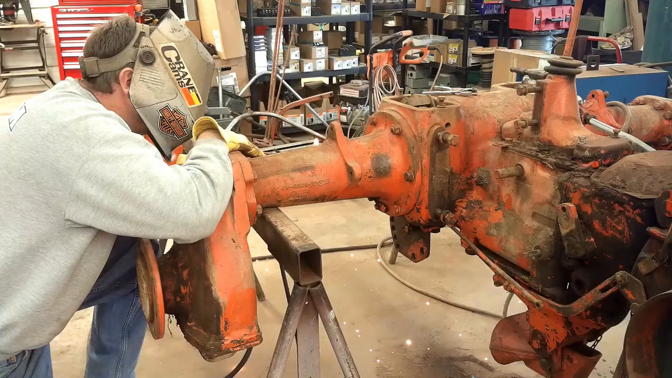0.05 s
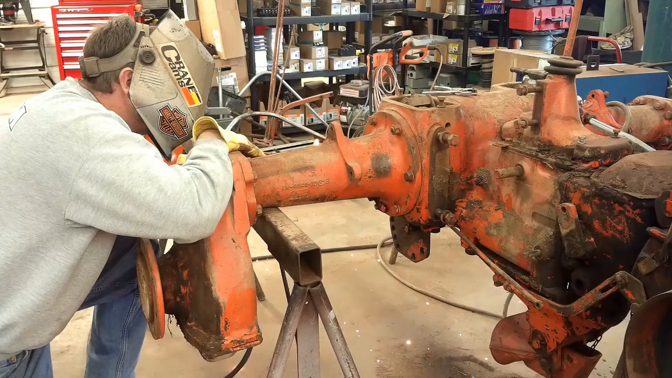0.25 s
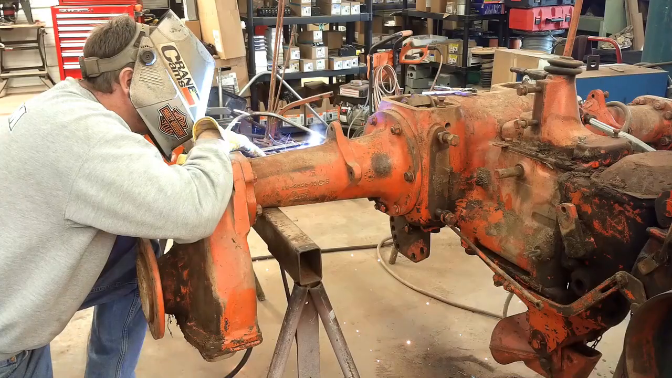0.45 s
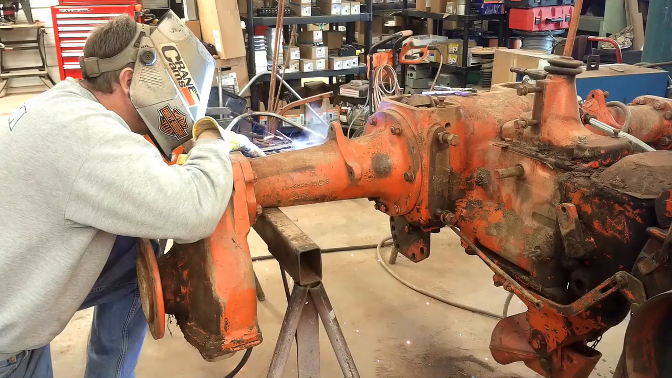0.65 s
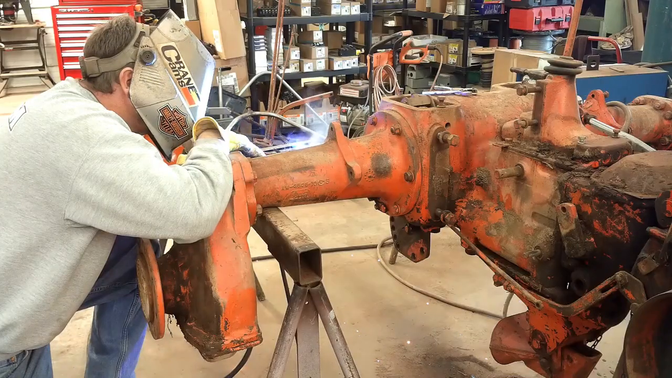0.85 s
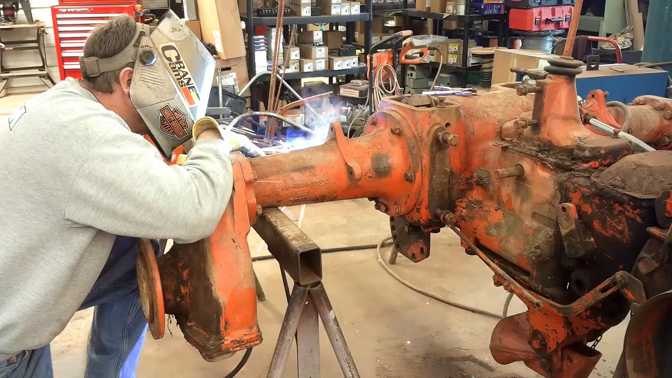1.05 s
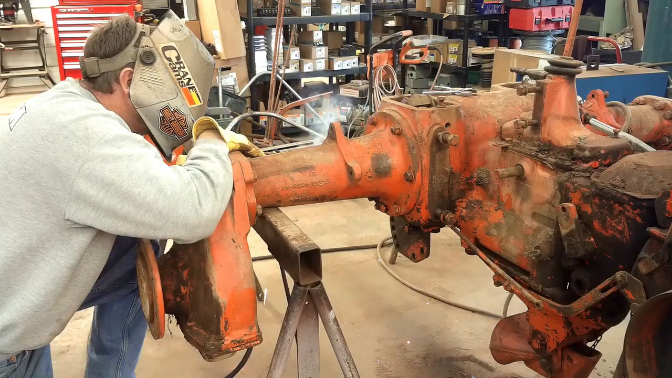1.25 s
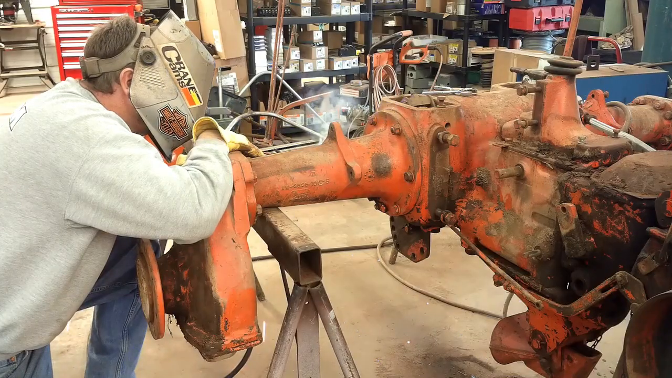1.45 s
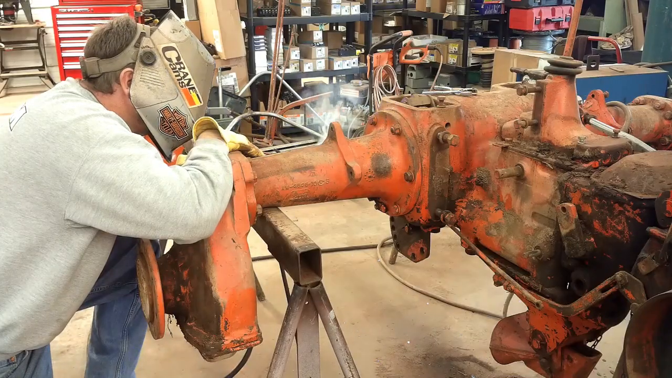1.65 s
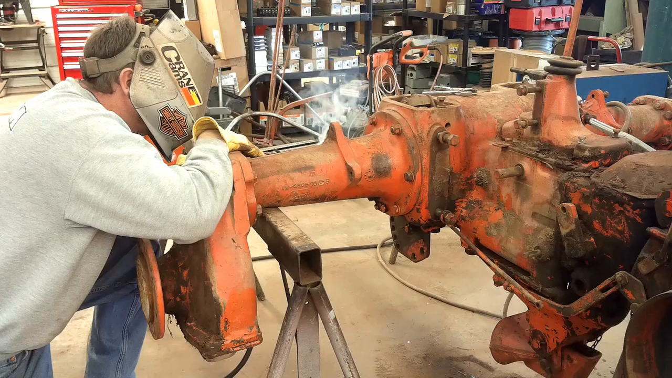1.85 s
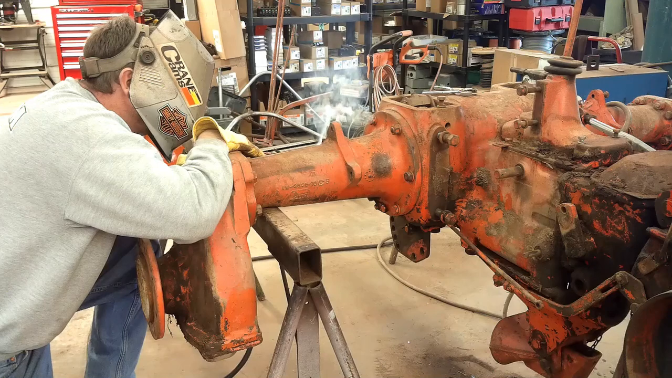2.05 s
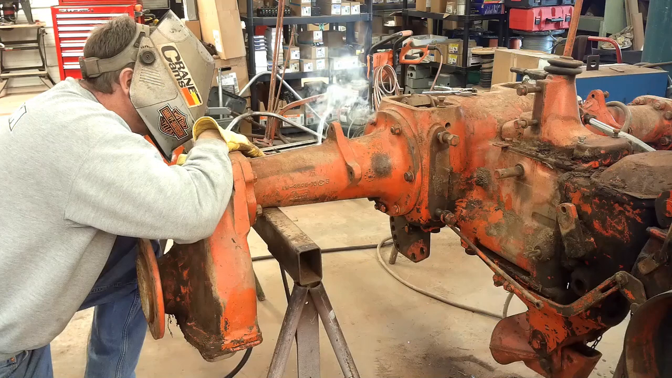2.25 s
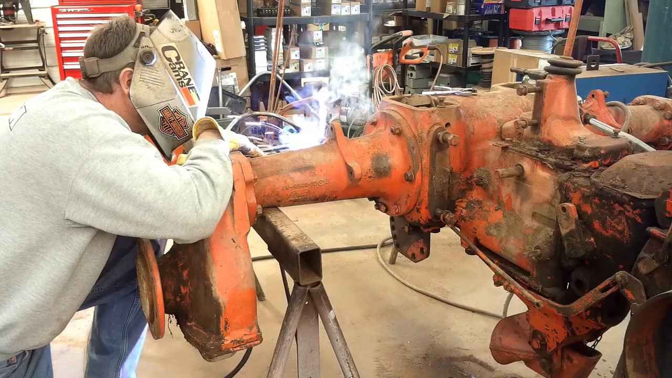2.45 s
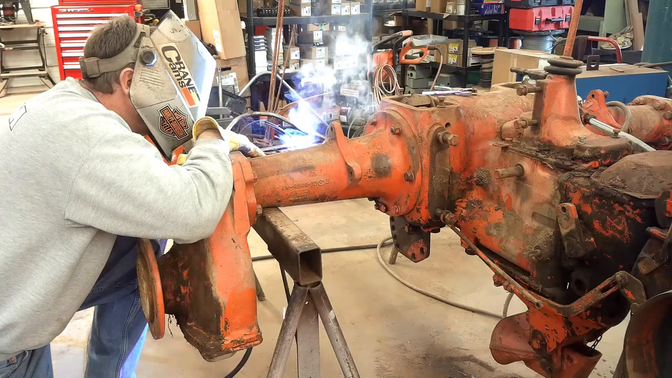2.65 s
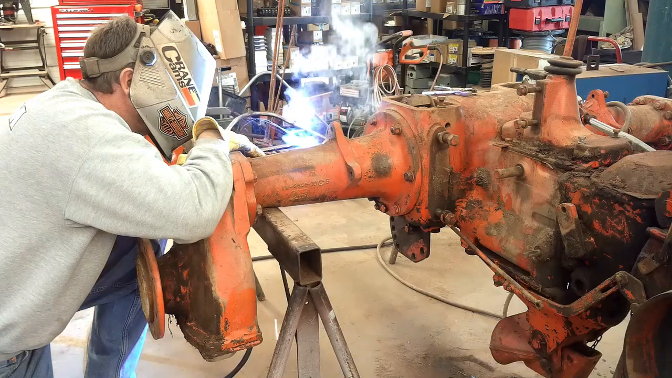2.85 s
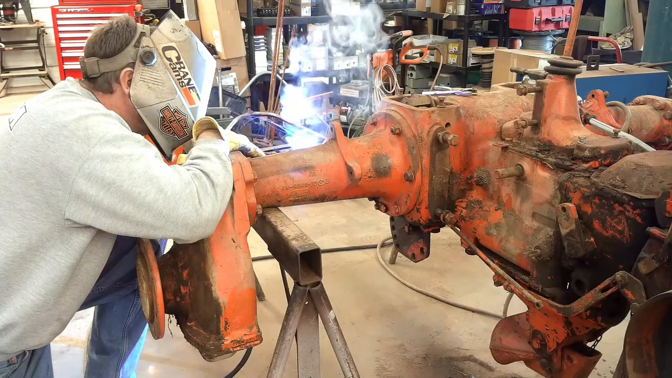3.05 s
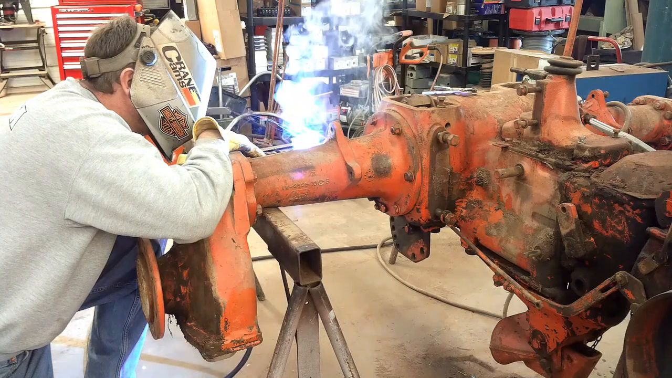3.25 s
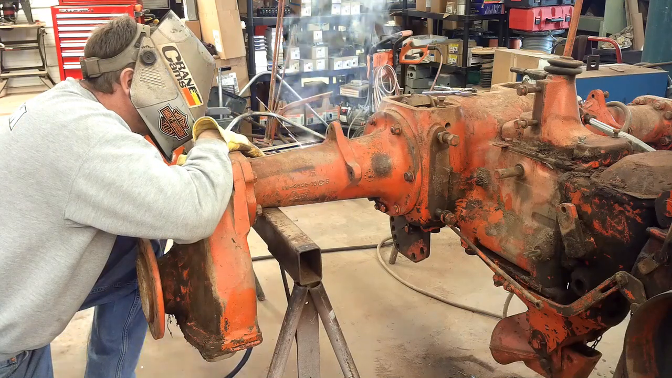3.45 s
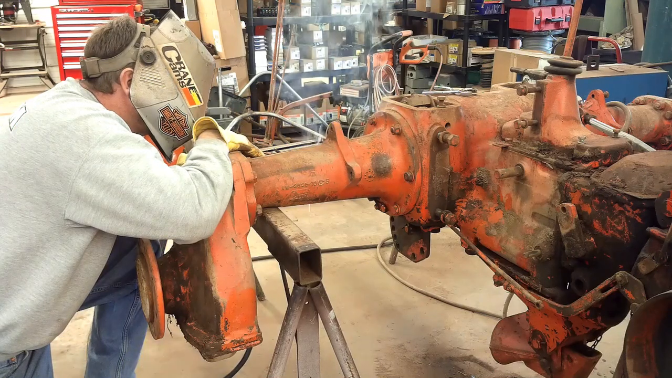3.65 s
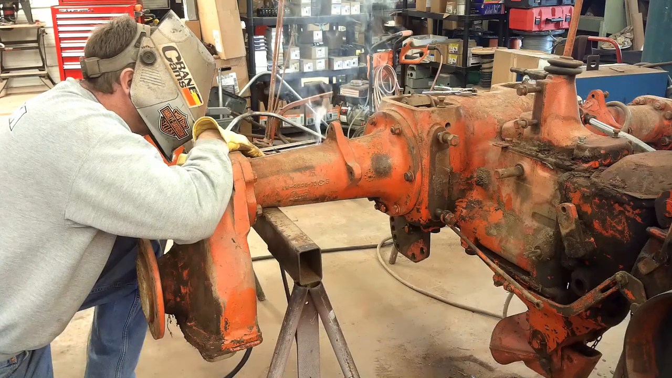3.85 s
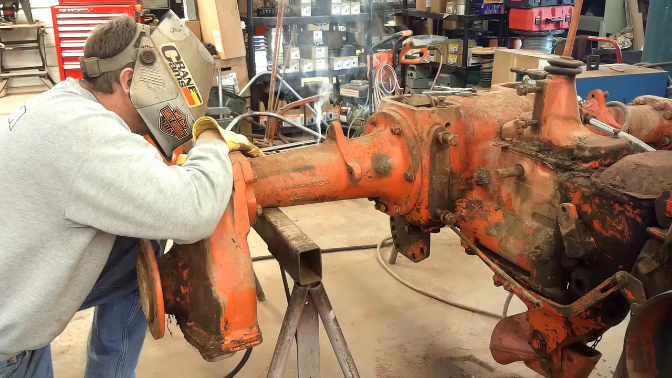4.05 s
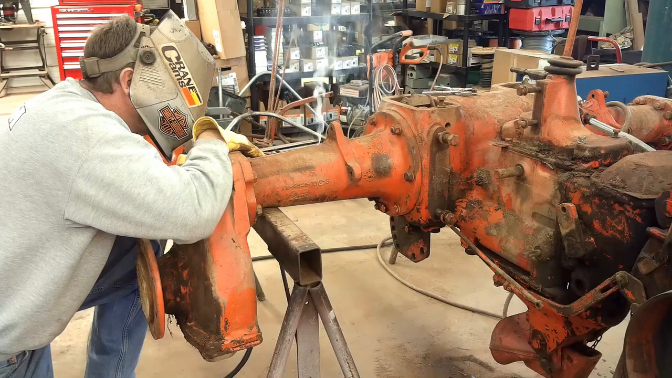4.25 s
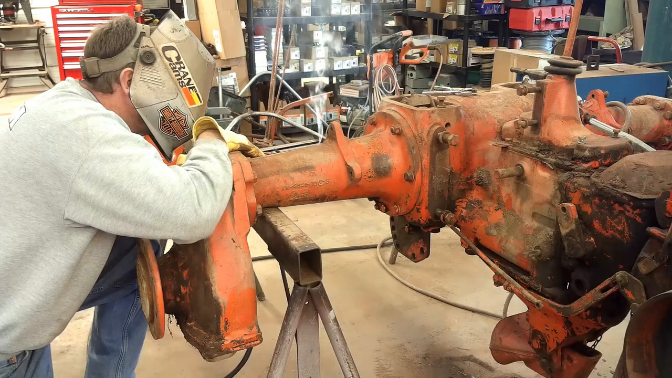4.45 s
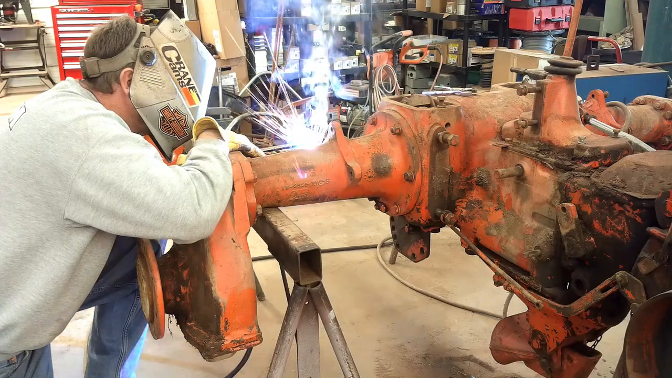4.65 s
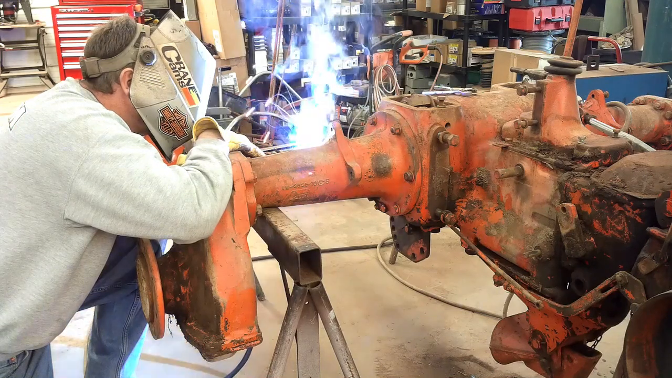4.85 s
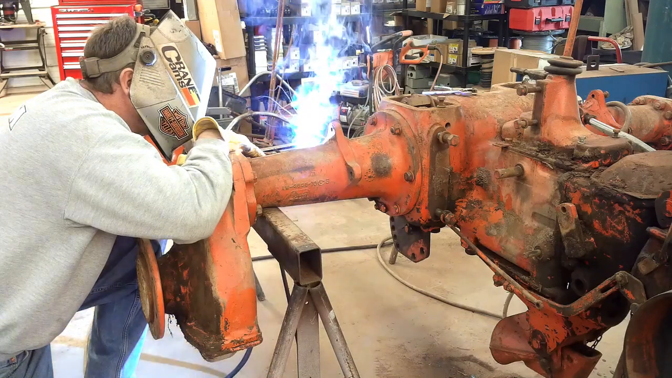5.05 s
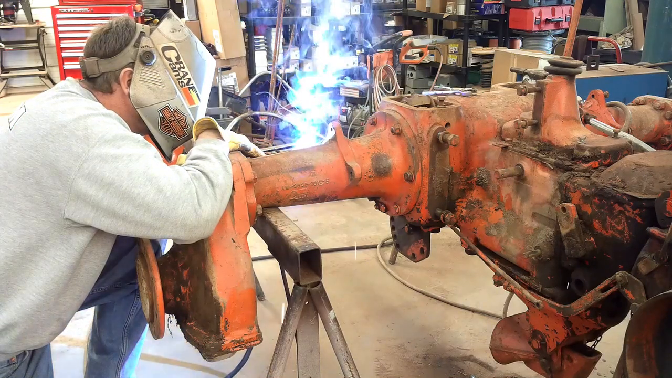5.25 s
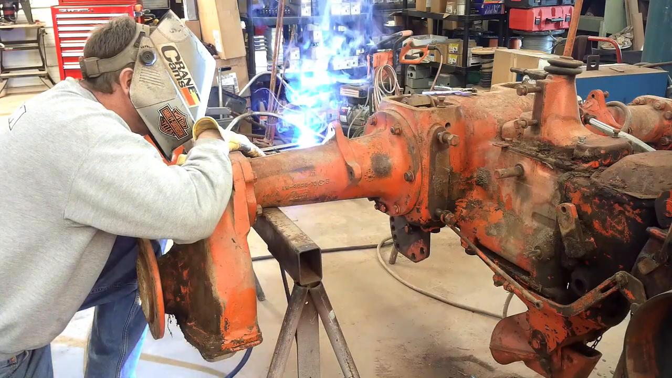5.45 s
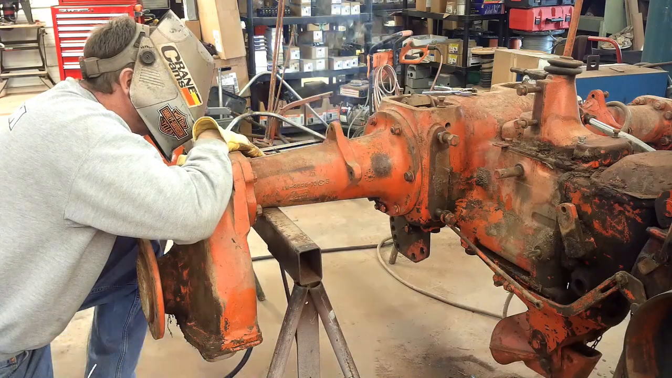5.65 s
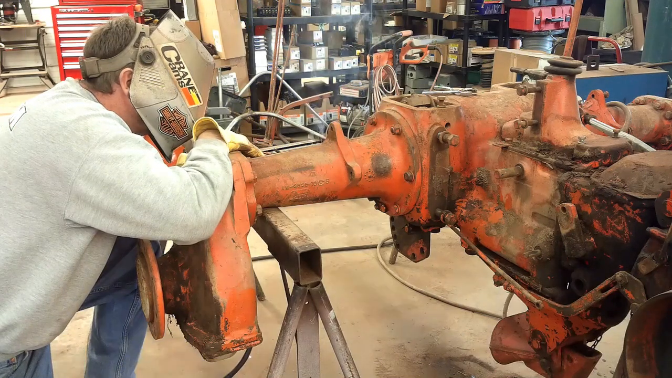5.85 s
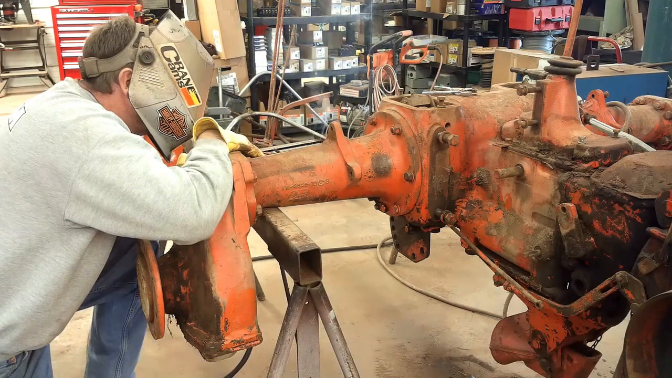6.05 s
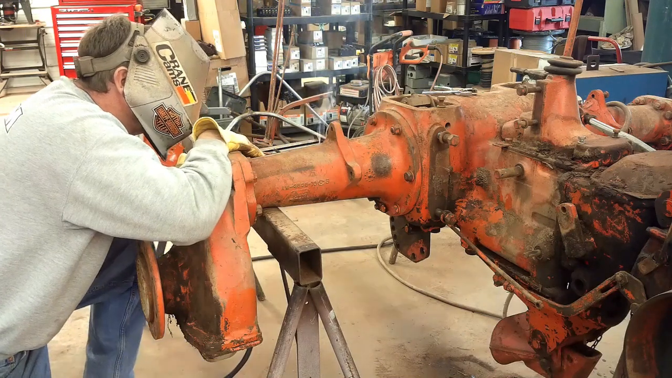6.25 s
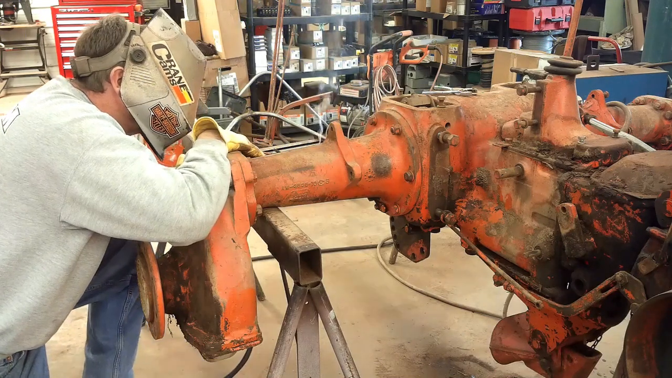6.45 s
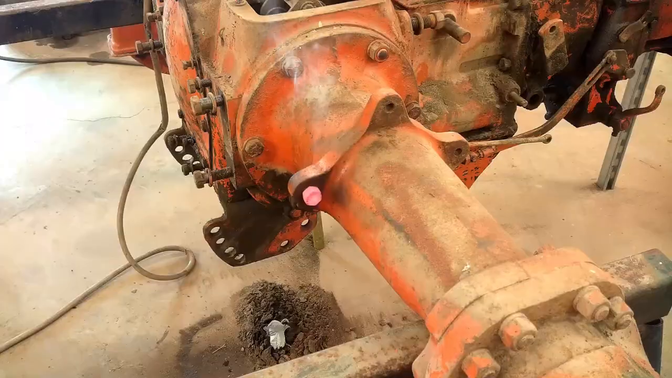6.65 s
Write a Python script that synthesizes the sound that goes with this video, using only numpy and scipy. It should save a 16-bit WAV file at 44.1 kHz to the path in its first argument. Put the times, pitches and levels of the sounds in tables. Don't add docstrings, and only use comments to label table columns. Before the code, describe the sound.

Three short welding bursts: the first sputtering and popping, the next two steadier buzzing sizzles, separated by relay rattles and quiet transformer hum.

```python
import sys
import numpy as np
from scipy import signal
from scipy.fft import rfft, irfft
from scipy.io import wavfile
from scipy.ndimage import uniform_filter1d

SR = 44100
rng = np.random.default_rng(int(sys.argv[2]) if len(sys.argv) > 2 else 0)


def generate_wav(sig):
    pcm = np.round(np.clip(np.atleast_2d(sig).T, -1, 1) * 32767).astype(np.int16)
    wavfile.write(sys.argv[1], SR, pcm)


def nominal_scale(level):
    x = np.asarray(level, float) / 20
    return 10 ** x


N = 295602


def rms_one(x):
    return x / np.sqrt(np.mean(x ** 2) + 1e-20)


def lowpass(x, hz):
    return signal.sosfilt(signal.butter(2, hz, fs=SR, output="sos"), x)


def in_time(tables):
    t = np.arange(N) / SR
    s, *columns = np.transpose(np.concatenate(tables))
    gate = sum((t >= rows[0][0]) & (t < rows[-1][0]) for rows in tables)
    return [np.interp(t, s, c) for c in columns] + [gate]


def at_hz(points, hz):
    f, value = np.transpose(points)
    return np.interp(np.log(np.maximum(hz, 1)), np.log(f), value)


def colour(x, spectrum):
    log_gain = at_hz(spectrum, np.fft.rfftfreq(4096, 1 / SR)) * np.log(10) / 20
    cepstrum = irfft(log_gain)
    cepstrum[1:2048] *= 2
    cepstrum[2049:] = 0
    pulse = irfft(np.exp(rfft(cepstrum)))
    return signal.fftconvolve(x, pulse / np.linalg.norm(pulse))[:N]


def resonate(x, modes):
    out = 0
    for k, (hz, width_hz, db) in enumerate(modes):
        r = np.exp(-np.pi * width_hz / SR)
        poles = [1, -2 * r * np.cos(2 * np.pi * hz / SR), r * r]
        ring = signal.lfilter([1, 0, -1], poles, x + 1e-18)
        out = out + (-1) ** k * nominal_scale(db) * np.sqrt((1 - r * r) / 2) * ring
    return out


def grains(per_s, spread_db):
    sizes = nominal_scale(spread_db * np.minimum(rng.exponential(1, N), 3))
    signs = rng.choice([-1, 1], N)
    return rms_one(sizes * signs * (rng.random(N) < per_s / SR))


def struck(rows):
    clicks = np.zeros(N)
    for s, db in rows:
        clicks[round(s * SR)] = nominal_scale(db)
    return clicks


# strike t/s, arc out t/s, fizz/dB, bass/dB, top/dB
BURSTS = [
    (0.417, 1.28, -5, -0.5, -2),
    (2.431, 3.5, -15.5, 4.5, -2),
    (4.742, 5.7, -22.5, 5.5, -3.5),
]
# casting ring/dB, sputter/dB, feeder whine/dB, hum left after/dB, air/dB
LOADS = [
    (-16, -1, -52, -19, -3.5),
    (-12.5, -5, -40.5, 1.5, -1.5),
    (-9.5, -12, -40, -0.5, -4),
]


def per_burst(rows, before):
    turn = np.searchsorted(np.array(BURSTS)[:, 0] * SR, np.arange(N), side="right")
    return np.vstack([before, rows])[turn].T


# t/s, level/dB
ARC_POWER = [
    [(0.417, -28), (0.58, -21), (0.7, -16), (0.86, -16.5), (1.07, -16.5), (1.09, -13), (1.14, -15),
     (1.15, -25), (1.28, -17.5)],
    [(2.428, -18.5), (2.49, -16.5), (2.6, -19), (2.7, -20.5), (2.95, -24.5), (3.17, -22), (3.35, -22.5),
     (3.5, -24)],
    [(4.7275, -34), (4.76, -17), (4.93, -19.5), (5.06, -23), (5.3, -22.5), (5.5, -21.5), (5.7, -23)],
]
# f/Hz, density/dB
CRACK = [(60, -51), (120, -43), (350, -24), (950, -10.5), (2100, -5.5), (3000, 0), (3900, -4.5), (5400, -2),
         (6400, -7.5), (8000, -10), (9800, -8.5), (11200, -23), (13200, -12), (15600, -22.5)]
# f/Hz, width/Hz, level/dB
CASTING = [(2324, 80, -1.5), (3077, 45, -1), (3763, 20, -0.5), (4400, 72, 3), (4870, 29, -7.5),
           (5218, 45, -1.5), (5460, 13, -15), (8560, 330, -13)]
# f/Hz, width/Hz, level/dB
PUNCH = (950, 700, -5)


def arc():
    shorts_hz, settle_s = 120, 0.49
    arc_db, gate = in_time(ARC_POWER)
    strike, _, fizz_db, bass_db, top_db = per_burst(BURSTS, BURSTS[0])
    ring_db, sputter_db, _, _, air_db = per_burst(LOADS, LOADS[0])

    cold = np.exp(-np.abs(np.arange(N) / SR - strike) / settle_s)
    fizz_db, bass_db = fizz_db - 2 * cold, bass_db + 2 * cold
    ring_db, top_db = ring_db + 1.5 * cold, top_db - 2 * cold

    count = int(N / SR * shorts_hz) - 1
    chance = rng.standard_normal((count, 2))
    cycles = np.arange(count) + 0.98 + 0.056 * chance[:, 0].clip(-3, 3)
    at = (cycles * SR / shorts_hz).astype(int).clip(0, N - 1)
    shorts = np.zeros(N)
    shorts[at] = nominal_scale(3 * chance[:, 1].clip(-2, 1.5))
    steady = nominal_scale(-3) * rms_one(shorts) + nominal_scale(-0.5) * grains(1500, spread_db=3)

    pops = restrikes()
    fade = np.exp(-1 / (0.003 * SR))
    sputter_level = signal.lfilter([1], [1, -fade], pops + 1e-18)
    sputter = sputter_level * rng.standard_normal(N) * nominal_scale(sputter_db - 6.5)
    drive = steady * nominal_scale(arc_db - 4.5) * gate + lowpass(nominal_scale(12.5) * pops + sputter, 10500)

    crack = colour(drive, CRACK)
    bass = lowpass(crack, 1500)
    top = signal.sosfiltfilt(signal.butter(2, [11300, 14000], "band", fs=SR, output="sos"), crack)
    air = signal.sosfiltfilt(signal.butter(4, 14000, "high", fs=SR, output="sos"), crack)
    fizz = nominal_scale(fizz_db) * resonate(drive, [(8850, 2000, 0.012)])
    airborne = crack + (nominal_scale(bass_db) - 1) * bass + (nominal_scale(top_db) - 1) * top + (nominal_scale(air_db) - 1) * air + fizz
    thump = resonate(pops ** 2, [(71.1, 250, -13), PUNCH])
    return airborne, nominal_scale(ring_db) * resonate(drive, CASTING) + thump


# t/s, peak/dB
POPS = [(2.6071, -12.5), (2.6567, -12.6), (2.682, -13.9), (2.6899, -14.2), (3.0075, -16.9), (3.0407, -16.6),
        (3.0983, -14.6), (3.1052, -13.4), (3.1501, -12.7), (3.2232, -14.6), (3.2661, -15.7),
        (3.3759, -15.6), (3.4145, -15.4), (3.4328, -15.3), (4.8221, -10.9), (4.8407, -10.5),
        (4.8604, -11.7), (4.8993, -11.4), (4.9139, -12.3), (4.9489, -12.7), (5.0247, -14.5), (5.066, -13.6),
        (5.1238, -12.9), (5.132, -12.3), (5.2009, -14.7), (5.2494, -13.7), (5.3339, -13.5), (5.3952, -11.2),
        (5.4848, -13.9), (5.6764, -13.5)]
# t/s, peak/dB
OPENING = [(2.4286, -8), (2.4317, -14), (2.4356, -13), (2.4461, -14), (2.4504, -10), (2.4587, -11),
           (2.463, -8), (2.4695, -9), (2.4723, -7), (2.481, -6.5), (2.4842, -7), (4.7276, -1),
           (4.7307, -4.5), (4.7346, -3), (4.7387, -9.5), (4.742, -11), (4.7469, -12), (4.7581, -11.5)]
# t/s, length/s, peak/dB
STUBS = [(0.4152, 0.015, -4.5), (0.4415, 0.019, -4.5), (0.4715, .015, -4), (0.5001, 0.004, -5),
         (0.5126, 0.012, -7), (0.594, 0.012, -0.5), (0.612, 0.02, -5), (0.6421, 0.00099, -6),
         (0.6563, 0.0081, -0.5), (0.678, 0.0084, -3), (0.7023, .015, -5), (0.749, 0.0096, -5.5),
         (0.7649, 0.0054, 0), (0.838, 0.0023, -6), (0.8486, .009, -0.5), (0.885, 0.0059, -8),
         (0.9203, 0.0017, -12), (0.9841, 0.0027, -15.5), (0.999, .015, -12), (1.0554, 0.0063, -9),
         (1.0839, .047, 1), (1.1388, 0, -3), (1.182, 0.0025, -5), (1.2214, 0.0049, -1),
         (1.25, 0.0048, -11.5), (0.5885, 0, -10.5), (1.0713, 0, -7)]


def restrikes():
    gap_s, spread_db, fall_db_per_s = 0.004, 3, 150.5
    rows = POPS + OPENING
    chances = rng.uniform(-1, 1, (len(STUBS), 2, 16))
    for (s, length_s, db), (gap_chance, size_chance) in zip(STUBS, chances):
        gaps = gap_s * (1 + 0.3 * gap_chance)
        after_s = np.cumsum(gaps) - gaps[0]
        for a, c in zip(after_s, size_chance):
            if a <= max(length_s, 0):
                rows += [(s + a, db + 0.43 + spread_db * c - fall_db_per_s * min(a, 0.012))]
    return struck(rows)


# seated t/s, chatter/s, rattle/dB, thud/dB, knock/dB
TRIGGER = [
    (0.393, .022, -24, -33, -41.5),
    (1.261, 0.084, -15, -44.5, -41),
    (2.414, .014, -29, -33.5, -48),
    (3.507, .05, -15.5, -43.5, -26.5),
    (4.7, .027, -25.5, -40, -34),
    (5.708, 0.037, -14, -47, -35.5),
]
# f/Hz, density/dB
RATTLE = [(700, -31.5), (1200, -5), (2300, 0.5), (2800, -3), (3600, 2.5), (4000, -7), (4400, 1.5),
          (5100, -5.5), (5700, -14), (7700, -19), (12000, -41.5), (16000, -55)]
# f/Hz, width/Hz, level/dB
SEAT_RING = [(3750, 18, -13), (4300, 18.17, -13.5)]
# f/Hz, width/Hz, level/dB
THUD = [(153, 21, -8), (306, 60, 4.5), (368, 97, -4)]
# f/Hz, width/Hz, level/dB
KNOCK = [(620, 90, -9), (1000, 50, 0)]


def trigger():
    close_db_per_s, rattle_fall_db_per_s, body_fall_db_per_s = 1499.5, 500.5, 145
    thud_lag_s, knock_lag_s = 0.008, 0.03
    t = np.arange(N) / SR
    rattle, thud, knock = 0, 0, 0
    for s, hold_s, rattle_db, thud_db, knock_db in TRIGGER:
        closing_db = close_db_per_s * np.clip(t - s, -1, 0)
        after = np.clip(t - s - hold_s, 0, 1)
        begun = t > s - 0.03
        rattle_curve = nominal_scale(rattle_db + closing_db - rattle_fall_db_per_s * after)
        rattle = rattle + rattle_curve * begun * (after < 0.035)
        body = nominal_scale(closing_db - body_fall_db_per_s * after) * begun * (after < 0.054)
        thud = thud + nominal_scale(thud_db) * body
        knock = knock + nominal_scale(knock_db) * body
    chatter = nominal_scale(-6) * grains(2500, spread_db=3)
    seat = colour(chatter * rattle, RATTLE)
    frame = resonate(chatter * rattle, SEAT_RING + [(600, 270, -14.5)])
    cabinet = resonate(chatter * np.roll(thud, int(thud_lag_s * SR)), THUD)
    late_frame = resonate(chatter * np.roll(knock, int(knock_lag_s * SR)), KNOCK)
    return seat + frame + cabinet + late_frame


# f/Hz, width/Hz, level/dB
FEED_MESH = [(1376, 12, 0)]


def feeder():
    spin_up_s = 0.37
    held = uniform_filter1d(in_time(ARC_POWER)[-1] * 1.0, size=4000)
    strike = per_burst(BURSTS, BURSTS[0])[0]
    spun = np.clip((np.arange(N) / SR - strike) / spin_up_s, 0, 1)
    whine = rms_one(resonate(rng.standard_normal(N), FEED_MESH))
    return nominal_scale(per_burst(LOADS, LOADS[0])[2]) * spun * held * whine


# t/s, peak/dB
SET_DOWN = [
    (6.645, -41.5),
    (6.685, -42.5),
]
# f/Hz, width/Hz, level/dB
BENCH = [(600, 150, -3), (1000, 600, 0)]


def tool():
    return nominal_scale(4) * resonate(struck(SET_DOWN), BENCH)


# t/s, peak/dB
TICKS = [
    (0.06, -40.5),
    (0.2667, -44),
]


def cooling():
    return nominal_scale(8.5) * colour(struck(TICKS), CRACK)


# lag/s, level/dB
NEAR_ECHOES = [(0.00025, -3), (0.00052, -5), (0.00075, -7), (0.00103, -7), (0.0031, -8), (0.0042, -14)]


def nearby(x):
    front = signal.lfilter([0.8, -1], [1, -0.8], x)
    out = front.copy()
    for s, db in NEAR_ECHOES:
        lag = round(s * SR)
        out[lag:] += nominal_scale(db) * front[:-lag]
    return out


# f/Hz, T60/s
SHOP_T60 = [(100, .85), (300, .85), (600, .7), (1200, .62), (4000, .66), (8000, .5), (14000, .36)]


def shop(x):
    t = np.arange(SR) / SR
    tail = np.zeros(SR)
    edges = 60 * 2 ** np.arange(0, 8.3, 0.5)
    for low, high in zip(edges, edges[1:]):
        sos = signal.butter(2, [low, high], "band", fs=SR, output="sos")
        band = signal.sosfilt(sos, rng.standard_normal(SR))
        t60_s = np.clip(at_hz(SHOP_T60, np.sqrt(low * high)), 0.05, 3)
        tail += band * nominal_scale(-60 * t / t60_s)
    tail *= np.clip((t - 0.003) / 0.017, 0, 1)
    return signal.fftconvolve(x, tail / np.linalg.norm(tail))[:N]


def suppress(x, knee_db, slope):
    level_db = 10 * np.log10(uniform_filter1d(x ** 2, size=1323).clip(1e-12))
    cut_db = slope * np.minimum(level_db - knee_db, 0).clip(-40, 0)
    bass = signal.sosfiltfilt(signal.butter(2, 1100, fs=SR, output="sos"), x)
    return (x - bass) * nominal_scale(cut_db) + bass * nominal_scale(0.5 * cut_db)


# f/Hz, density/dB
QUIET = [(12, -31), (20, 0.5), (92, 1), (297, -5.5), (361, -5), (427, -15), (596, -3.5), (667, -12),
         (1230, -18), (2090, -18.5), (2270, -18), (13100, -25), (15500, -27)]
# t/s, level/dB
QUIET_DB = [(0, -58), (1.0, -59), (2.4, -61), (3.8, -60), (6.7, -60)]
# f/Hz, rms/dB
IDLE_HUM = [(360.7, -70.5), (479.1, -75), (597.5, -79.5), (721.4, -76.5), (839.8, -83.5), (1502, -82),
            (2040, -82.5), (2401, -87)]
# f/Hz, rms/dB
FAN_LINE = (347, -75)
# f/Hz, rms/dB
WARM_HUM = [(538.3, -68.5), (662.1, -76), (780.6, -67), (899.0, -74.5), (958, -86), (1017, -89.5),
            (1502, -78.5), (2040, -89)]


def quiet():
    first_hum_db, cooling_db_per_s = -15, 8.5
    t = np.arange(N) / SR
    noise = colour(rng.standard_normal(N), QUIET) * nominal_scale(in_time([QUIET_DB])[0])
    arc_out = per_burst(BURSTS, BURSTS[0])[1]
    left_db = per_burst(LOADS, [0, 0, 0, first_hum_db, 0])[3]
    warmth = nominal_scale(left_db - cooling_db_per_s * np.clip(t - arc_out, 0, 9))

    def hum(lines):
        return sum(nominal_scale(db + 6.5) * np.sin(2 * np.pi * (hz * t + rng.random())) for hz, db in lines)

    idle = nominal_scale(-4.5) * hum(IDLE_HUM + [FAN_LINE])
    return noise + idle + uniform_filter1d(warmth, size=4000) * hum(WARM_HUM)


def scene():
    crack, ringing = arc()
    near = crack + trigger()
    direct = nominal_scale(-4) * nearby(near)
    wet = nominal_scale(-5) * shop(near + nominal_scale(-12) * ringing)
    welder = direct + nominal_scale(-2) * ringing + feeder() + wet
    mono = suppress(welder, knee_db=-36.5, slope=0.99) + cooling() + tool() + quiet()
    return np.array([mono, mono])


def low_pass(x):
    return signal.sosfilt(signal.butter(12, 15620, fs=SR, output="sos"), x)


def record(dry):
    mute_before_s, mute_after_s = 0.032, 0.018
    t = np.arange(N) / SR
    near_strike = sum((t > s - mute_before_s) & (t < s + mute_after_s) for s, *_ in BURSTS)
    muted = uniform_filter1d(near_strike * 1.0, size=200)
    dulling = signal.cheby2(10, 30, 9200, fs=SR, output="sos")
    x = np.clip(dry + muted * (signal.sosfiltfilt(dulling, dry) - dry), -1, 1)
    x = x + 0.9 * muted * (signal.sosfiltfilt(dulling, x) - x)
    x = signal.sosfilt(signal.cheby2(12, 50, 16400, fs=SR, output="sos"), x)
    return low_pass(np.clip(x, -1, 1))


dry = scene()
out = record(dry)
generate_wav(out)
```